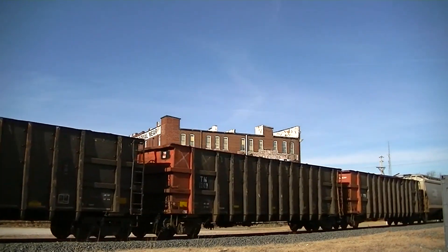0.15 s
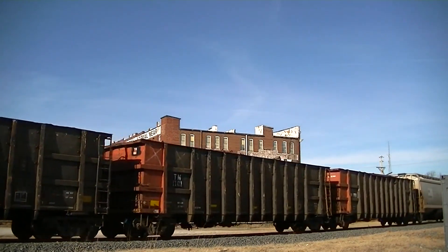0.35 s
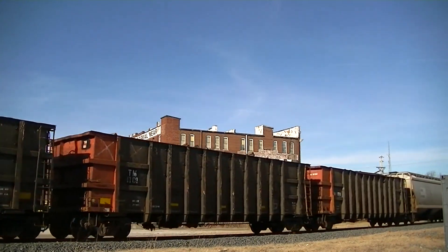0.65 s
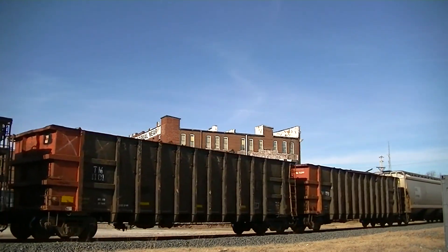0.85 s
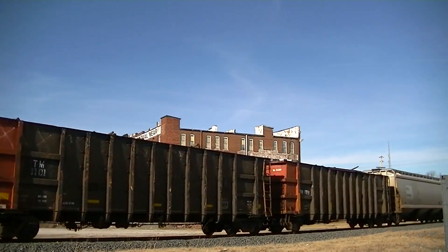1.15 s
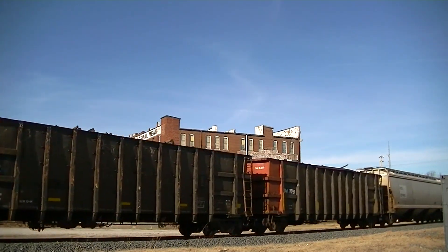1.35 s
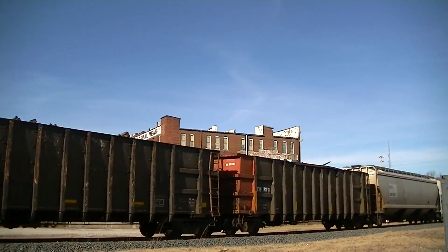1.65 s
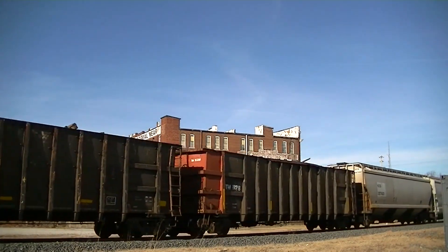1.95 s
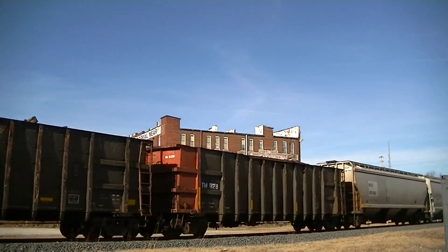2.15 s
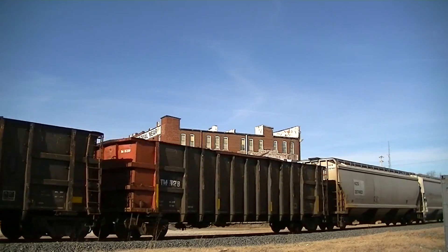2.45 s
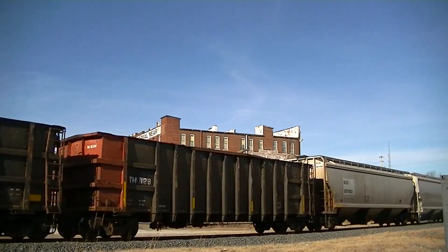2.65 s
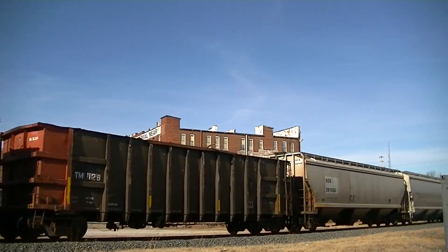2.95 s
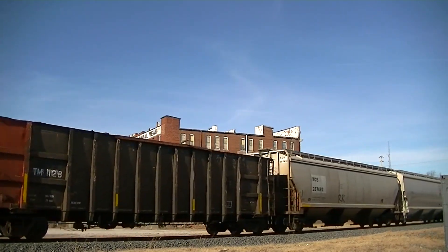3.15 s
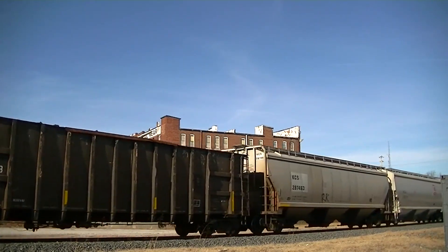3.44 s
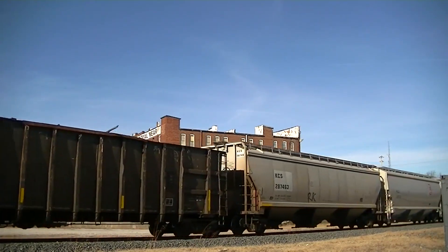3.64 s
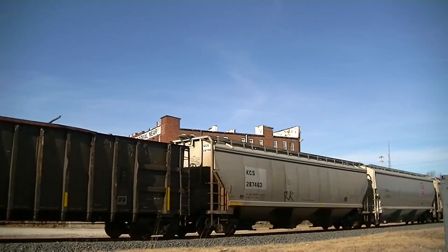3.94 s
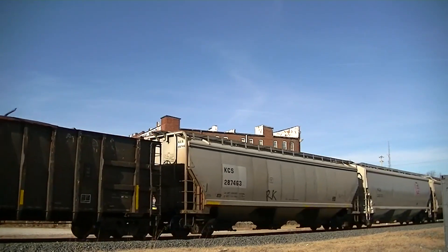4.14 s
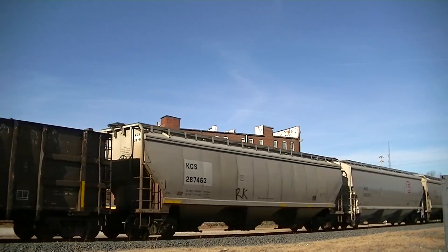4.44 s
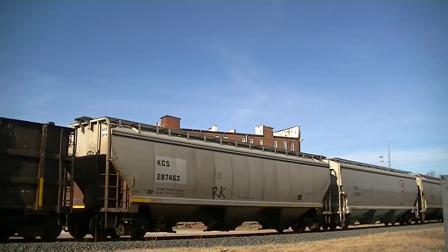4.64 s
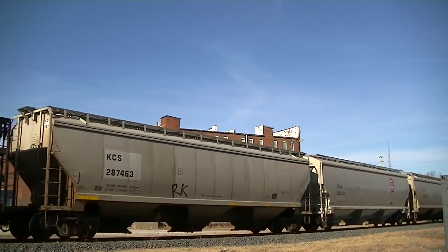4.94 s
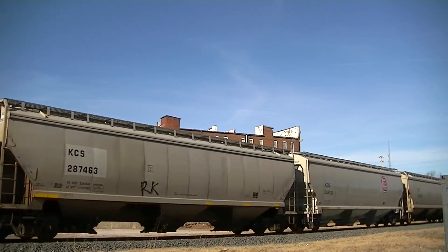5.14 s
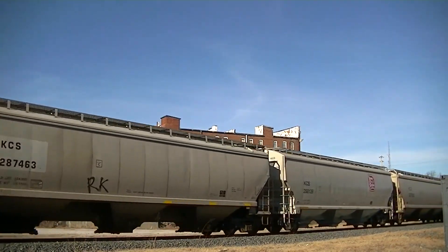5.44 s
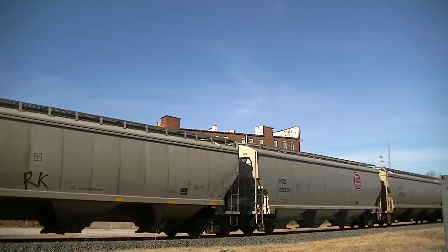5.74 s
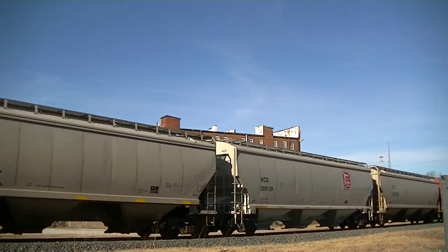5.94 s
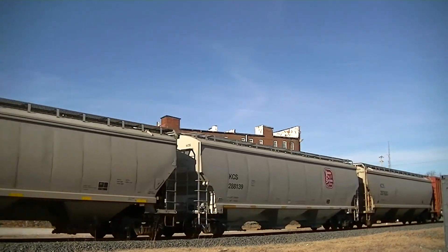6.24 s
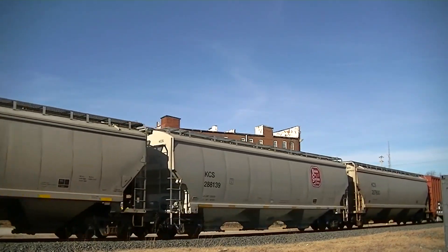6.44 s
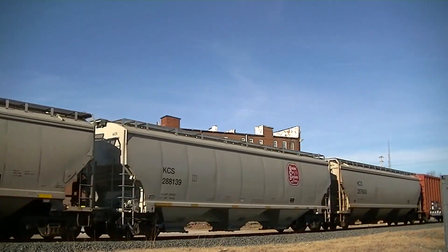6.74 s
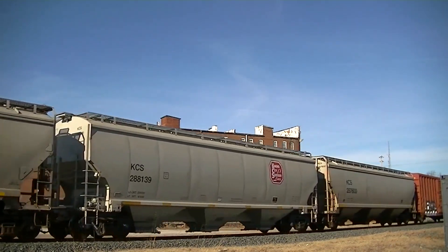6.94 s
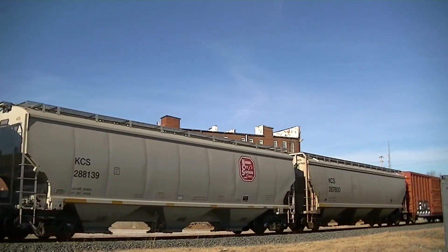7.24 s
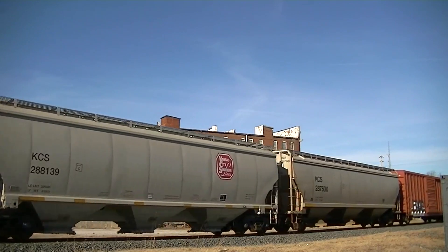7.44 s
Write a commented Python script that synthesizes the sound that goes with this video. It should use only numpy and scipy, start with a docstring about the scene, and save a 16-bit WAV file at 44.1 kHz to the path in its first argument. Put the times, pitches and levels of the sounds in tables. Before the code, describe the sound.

Close beside an outdoor track, freight wagons rumble and roar past while a distant chordal train horn is already blowing. As it fades, a long, piercing metallic wheel squeal takes over, thinning into high whistles. Then come rapid dull knocks and dry steel chirps, a second short squeal sinking in pitch, wind puffs on the microphone, and the far horn again.

```python
"""A far horn is already sounding up the line while a freight train rumbles and roars past close by.
Rolling, grinding flanges and wind are coloured noise; the horn is a chord of wavering partials.
Squeals are vibrating wheel modes: one long squeal that ends in thin whistles, then a short one after
a few knocks and chirps, which are brief dying noise bursts. The horn sounds again near the end."""
import sys
import numpy as np
from scipy import signal
from scipy.fft import rfft, irfft, next_fast_len
from scipy.io import wavfile
from scipy.ndimage import uniform_filter1d

SR = 44100
rng = np.random.default_rng(int(sys.argv[2]) if len(sys.argv) > 2 else 0)


def master(y):
    """Save y as 16-bit WAV."""
    cut = np.clip(np.atleast_2d(y).T, -1, 1)
    pcm = np.round(cut * 32767)  # scale
    wavfile.write(sys.argv[1], SR, pcm.astype(np.int16))


N = 334719
TIME = np.arange(N) / SR  # seconds

# Noise colour of the wagons, rail, flanges and wind: (frequency [Hz], relative density [dB per Hz])
RUMBLE_COLOUR = [(90, -52), (150, -18.5), (210, -10), (300, 1.5), (450, 3.5), (700, -1.5), (1100, -8.5),
                 (2500, -46)]
ROAR_COLOUR = [(150, -32.5), (400, -4.5), (700, -3.5), (1000, 2), (1250, -0.5), (1650, 3), (2150, 0.5),
               (2400, -4.5), (2750, -2), (3100, -6), (4200, -7), (5500, -15.5), (8000, -25.5),
               (15000, -54.5)]
HISS_COLOUR = [(300, -47), (900, -7), (1500, -2), (2000, 2), (3000, 1.5), (4500, 2.5), (6200, 0.5),
               (7500, -3.5), (9500, -7.5), (10300, -9.5), (12000, -16), (15500, -32)]
WIND_COLOUR = [(80, -40), (150, -17), (280, 2.5), (430, 3), (800, -5), (1600, -18), (5000, -49)]
# Stereo spread of the train noise, and of the wind at two separate ports: (frequency [Hz], side minus mid [dB])
TRAIN_SPREAD = [(300, -33), (900, -79), (2000, -19), (4000, -15.5), (8000, -65)]
WIND_SPREAD = [(100, 0), (5000, 0)]

# Rumble, sinking under the long squeal, and rail roar: (time [s], relative level [dB])
RUMBLE_LEVEL = [(0, -35.5), (.7, -39), (1.2, -36.5), (1.68, -33.5), (1.85, -43), (2.75, -46), (3.4, -45),
                (4.05, -50), (4.6, -53), (4.93, -48.5), (5.09, -36), (5.4, -40), (5.57, -36), (5.72, -44.5),
                (6.0, -38.5), (6.42, -44), (6.9, -38.5), (7.59, -38.5)]
ROAR_LEVEL = [(0, -32.5), (1.2, -33), (1.75, -33), (2.7, -41), (3.0, -38.5), (3.35, -44), (4.0, -45.5),
              (4.95, -45.5), (5.15, -38), (5.6, -32.5), (5.74, -44), (5.89, -37), (6.15, -41.5),
              (6.45, -49), (6.85, -40.5), (7.06, -37.5), (7.15, -40), (7.32, -36.5), (7.59, -36)]
# Jolts of the wagons over uneven rail: (time [s], relative peak level [dB])
JOLTS = [(1.27, -47), (2.97, -46), (3.38, -48), (3.57, -50.5), (5.87, -47), (6.28, -35), (6.52, -38),
         (6.73, -36), (7.07, -35)]
# Light scrapes of other flanges: (start [s], end [s], relative level [dB])
SCRAPES = [(0, 0.153, -59), (0.35, 0.618, -47), (1.503, 1.75, -50), (5.104, 5.56, -52.5),
           (5.735, 5.98, -56.5), (6.935, 7.06, -51.5), (7.236, 7.45, -50.5)]

# Modes of the long-squealing and short-squealing wheels: (frequency [Hz], width [Hz], relative level [dB])
LONG_WHEEL = [(1395, 25, -14), (1705, 110, -4), (2510, 60, -3.5), (3340, 90, -1.5), (3975, 70, -10),
              (4230, 110, -2), (4825, 90, -12), (5140, 100, -6), (5800, 150, -14), (6080, 60, -9),
              (6700, 100, -12.5), (7035, 90, -14), (7580, 70, -22), (8020, 70, -19), (8650, 110, -24),
              (9250, 160, -22), (10000, 230, -18), (10750, 160, -24)]
SHORT_WHEEL = [(1400, 50, -15), (1700, 190, -6.5), (2465, 90, -4), (3280, 90, -2), (4120, 120, -1.5),
               (5035, 80, -6), (5930, 100, -12), (6800, 200, -15), (8050, 110, -16), (8550, 120, -21),
               (9170, 80, -22), (9920, 60, -20), (10070, 70, -18), (10470, 50, -24), (10780, 70, -22)]
# Flange pressure on the long-squealing wheel: (time [s], level [dB])
LONG_PRESSURE = [(1.68, -44.5), (1.79, -30.5), (2.25, -29.5), (2.42, -31), (2.7, -30.5), (3.4, -33.5),
                 (3.85, -30), (4.55, -30), (4.95, -34.5), (5.08, -50), (5.4, -58)]
# Doppler shift as that wheel goes by: (time [s], pitch of the lower locked mode [Hz])
PASSING_PITCH = [(1.7, 3383), (2.2, 3377), (2.6, 3365), (3.0, 3353), (3.7, 3353), (4.3, 3338), (4.7, 3340),
                 (4.95, 3320), (5.1, 3260)]
# Flange pressure on the short-squealing wheel: (time [s], level [dB], Doppler shift [%])
SHORT_PRESSURE = [(6.06, -56, 1.38), (6.14, -31.5, 1.16), (6.28, -28.5, 0.67), (6.4, -29.5, 0.2),
                  (6.59, -31.5, -0.37), (6.65, -36.5, -0.67), (6.78, -42, -0.93), (6.9, -51, -1.9)]
# Hiss against ringing, harsher as the long-squealing wheel nears: (time [s], relative level [dB])
LONG_HARSHNESS = [(1.8, -7.5), (2.7, -8.5), (3.2, -4.5), (3.52, -3.5), (3.62, -1.5), (4.1, -4), (4.6, -5.5),
                  (4.95, -1)]
# The same for the short squeal, harshest at its first bite: (time [s], relative level [dB])
SHORT_HARSHNESS = [(6.08, 2.5), (6.15, -4), (6.28, -6.5), (6.38, -10.5), (6.6, -6), (6.8, -15.5)]
# A faint squeal from the same kind of wheel beforehand, one row: (start [s], end [s], level [dB])
FORE_SQUEAL = (.41, 0.59, -37.5)
# Spells when a main mode locks into self-sustained vibration: (start [s], end [s], level [dB])
LOWER_LOCKS = [(1.78, 1.95, -30.5), (1.96, 2.02, -26), (2.11, 2.2, -24), (2.24, 2.33, -27),
               (2.52, 2.84, -21), (2.88, 3.1, -23), (3.1, 3.56, -19), (3.63, 3.79, -22), (4.15, 4.39, -22),
               (4.52, 4.7, -21.5), (4.76, 4.93, -24), (5.0, 5.28, -37.5)]
UPPER_LOCKS = [(1.725, 1.83, -34), (1.84, 2.16, -25), (2.2, 3.36, -35), (3.84, 3.93, -31),
               (3.93, 4.16, -23.5), (4.2, 4.55, -30.5)]
# Single modes that swell and ring out: (start [s], end [s], frequency [Hz], level [dB], roughness [0-1])
WHISTLES = [(.404, .632, 5100, -39, .95), (.42, .65, 4190, -39.5, .95), (.4, .64, 3370, -42, 1),
            (1.76, 1.85, 1690, -28, .75), (1.78, 1.9, 2545, -32, .6), (2.08, 2.13, 2530, -30, .4),
            (2.23, 2.32, 5150, -29.5, .4), (2.48, 2.66, 5170, -36, .4), (2.603, 3.246, 1390, -40.5, .4),
            (2.92, 3.15, 1715, -34.5, .68), (2.92, 3.0, 6090, -36, .4), (3.0, 3.2, 8080, -43, .4),
            (3.3, 3.65, 3975, -38, .45), (3.66, 3.71, 6700, -35, .4), (3.84, 4.15, 1690, -31, .7),
            (3.86, 3.97, 6075, -31, .4), (3.9, 4.16, 7995, -38.5, .4), (3.9, 4.2, 8980, -46, .5),
            (4.04, 4.14, 7020, -36, .4), (4.2, 4.28, 5130, -31, .6), (4.24, 4.44, 6685, -33, .5),
            (4.3, 4.6, 3960, -35, .5), (4.4, 4.62, 7008, -33, .35), (4.44, 4.68, 6668, -33, .55),
            (4.45, 4.52, 1725, -28.5, .4), (4.45, 4.61, 5130, -29, .55), (4.66, 4.79, 2487, -27.5, .45),
            (4.7, 4.98, 5105, -34.5, .55), (4.76, 4.94, 6030, -37, .5), (4.77, 4.81, 6665, -34, .4),
            (4.8, 4.92, 4790, -36, .4), (4.82, 4.9, 9900, -41, .4), (4.85, 4.99, 2470, -35, .5),
            (4.88, 4.96, 6668, -31.5, .5), (5.393, 5.62, 1627, -44, .7), (6.08, 6.175, 2480, -28, .8),
            (6.12, 6.2, 1800, -33, .88), (6.2, 6.24, 4160, -31, .6), (6.255, 6.35, 3300, -28.5, .6),
            (6.28, 6.39, 5050, -35, .6), (6.29, 6.52, 4140, -27.5, .7), (6.46, 6.6, 2446, -37, .6),
            (6.45, 6.62, 5930, -37.5, .55), (6.535, 6.6, 4120, -27, .6), (6.545, 6.585, 5005, -32, .5)]
# Thin modes that sing on as the flange lets go: (frequency [Hz], level [dB])
THIN_MODES = [(4786, -38.5), (6685, -46), (6977, -49), (8177, -56), (8522, -48), (8880, -53), (9189, -48),
              (9860, -42.5), (10650, -43), (11540, -51.5)]
# Left-right place of the squeals: (time [s], left minus right [dB])
SQUEAL_PAN = [(0, 3), (1.7, -2), (2.3, -1.5), (3.2, -1), (4.2, -2.5), (5, 1), (6.2, 0.7), (7.59, 4)]

# Knocks of the running gear: (time [s], relative level [dB])
KNOCKS = [(5.617, -38), (5.700, -27.5), (5.752, -26), (5.819, -29), (5.868, -31), (5.909, -24),
          (5.955, -31), (5.994, -25), (6.031, -24.5), (6.066, -30), (6.102, -22.5), (6.731, -26)]
# Chirps of dry steel: (time [s], relative level [dB], frequency [Hz], width [Hz])
CHIRPS = [(5.742, -46, 8000, 600), (5.781, -40, 7340, 250), (5.790, -42, 8050, 250),
          (5.822, -45, 8250, 400), (5.876, -43, 7900, 500), (5.917, -38, 8100, 500),
          (5.926, -42, 7850, 250), (5.961, -47, 7900, 400), (6.031, -47, 7800, 2500),
          (6.068, -32, 6000, 3000), (6.097, -22.5, 6000, 3000), (6.272, -27, 6000, 2000)]

# Partials of the horn chord in each blast: (frequency [Hz], relative level [dB])
FIRST_CHORD = [(473, -42), (513, -42), (533, -43), (603, -38), (624, -39.5), (701, -36), (728, -37),
               (770, -36), (799, -40), (904, -35.5), (939, -31), (983, -36), (1029, -37), (1050, -38),
               (1066, -37), (1205, -43), (1250, -43), (1286, -39.5), (1401, -45), (1460, -44), (1541, -39),
               (1680, -43), (1798, -44), (1966, -43), (2053, -46)]
SECOND_CHORD = [(431, -46.5), (515, -45.5), (603, -35.5), (701, -46), (732, -36), (782, -43), (809, -46),
                (904, -42), (941, -36), (990, -42), (1046, -38), (1206, -44), (1410, -45), (1540, -41),
                (1798, -43)]
# Strength of each blast, added to its partials: (time [s], relative level [dB])
FIRST_BLAST = [(0, 3), (.17, -1.5), (.3, 1.5), (.55, -1.5), (.7, 2), (.8, -0.5), (.95, 3), (1.2, 2),
               (1.4, -1), (1.6, -4.5), (1.9, -20), (2.25, -38), (2.4, -42)]
SECOND_BLAST = [(6.75, -26), (6.98, -3.5), (7.15, -3.5), (7.35, 1.5), (7.59, -1)]
# The note of the first blast that lingers, one row: (start [s], end [s], frequency [Hz], level [dB])
LAST_NOTE = (1.55, 2.3, 730, -40)
# Gusts of wind on the microphone: (start [s], end [s], relative level [dB])
GUSTS = [(2.263, 2.484, -43.5), (2.545, 2.87, -53), (3.33, 3.45, -61), (5.58, 5.784, -40.5),
         (5.855, 6.053, -39), (6.117, 6.527, -43.5), (6.614, 6.897, -46.5), (7.035, 7.253, -42)]

JOLT_S = 0.038
HISS_UNDER_ROAR_DB = -31  # every rolling wheel rubs a little
SCRAPE_RISE_S, SCRAPE_T60_S = 0.063, 0.57
LOCK_RISE_S, LOCK_T60_S = 0.029, 0.6
UPPER_HZ, UPPER_WIDTH_HZ, UPPER_ROUGH = 4238, 65, 0.55
WHISTLE_RISE_SHARE, WHISTLE_T60_S = 0.35, 0.42  # the rise is a share of the time from start to end
THIN_START_S, THIN_END_S, THIN_RISE_S, THIN_T60_S = 4.74, 5.21, 0.24, 0.8
HORN_WIDTH_HZ, HORN_ROUGH, HORN_ECHO_S = 8, 0.72, 0.13
GUST_RISE_S, GUST_T60_S = 0.043, 0.35
EDDY_DEPTH = 0.4
RIPPLE_STEP_HZ = 22
LOW_CUT_HZ, EDGE_HZ = 70, 15700


def amp(db):
    """Decibels to gain."""
    return 10 ** (np.asarray(db) / 20)


def evened(x):
    """Scales to rms 1."""
    return x / np.sqrt(np.mean(abs(x) ** 2) + 1e-20)


def curve(rows, column=1):
    """One column of a table, drawn as a line through every sample."""
    rows = np.array(rows)
    return np.interp(TIME, rows[:, 0], rows[:, column])


def level(rows, column=1):
    """A dB column as a gain that falls 300 dB per second outside its span."""
    outside = np.maximum(np.maximum(rows[0][0] - TIME, TIME - rows[-1][0]), 0)
    return amp(curve(rows, column) - 300 * outside)


def read(points, hz):
    """A spectrum table at any frequency."""
    table_hz, db = np.transpose(points)
    return np.interp(np.log(hz + 1), np.log(table_hz), db)


def during(start, end):
    """The samples between two times."""
    return slice(max(round(start * SR), 0), round(end * SR))


def laid(sound, span):
    """Sets a short sound at its time in the scene."""
    out = np.zeros(N)
    out[span] = sound
    return out


def held(start, end, rise_s, t60):
    """An envelope that swells, holds until its end and rings out."""
    span = during(start, end + t60)
    t = TIME[span]
    swell = np.sin(np.pi / 2 * np.clip((t - start) / rise_s, 0, 1)) ** 2
    ring_out = amp(-60 * np.maximum(t - end, 0) / t60)
    return laid(swell * ring_out, span)


def placed(x, pan_db):
    """Sets a sound between left and right; positive dB leans left."""
    return x * np.array([amp(pan_db / 2), amp(-pan_db / 2)]).reshape(2, -1)


def flutter(width_hz, span=slice(None)):
    """Complex random envelope of a resonance of this width, with steep far skirts."""
    count = 4096
    offset = np.fft.fftfreq(count, TIME[-1] / count) / (width_hz / 2)  # in half-widths
    a, b = rng.standard_normal((2, count))
    line = (a + 1j * b) / (1 + 1j * offset) / (1 + 1j * offset / 4)
    envelope = evened(np.fft.ifft(line))
    return np.interp(TIME[span], np.linspace(0, TIME[-1], count), envelope)


def mode(hz, width_hz, rough=1, span=slice(None)):
    """A vibrating mode: a steady part plus a part shaken by random slips."""
    rough = np.clip(rough, 0, 1)
    swing = np.sqrt(1 - rough ** 2) + rough * flutter(width_hz, span)
    turns = np.cumsum(hz * np.ones(len(swing))) / SR + rng.random()
    phase = np.float32(2 * np.pi * (turns - np.floor(turns)))
    return np.sqrt(2) * (swing.real * np.cos(phase) - swing.imag * np.sin(phase))


def noise(colour, spread, patchy_db, flicker_db, ripple_db):
    """Coloured stereo noise: drifting patches, shared flicker, fixed ripple of countless weak resonances."""
    frames, bins = N // 256 + 5, 513
    a, b, c, d, patches = rng.standard_normal((5, frames, bins))
    patches = uniform_filter1d(patches, size=5, axis=0)
    patches = evened(uniform_filter1d(patches, size=12, axis=1))
    flicker = evened(uniform_filter1d(rng.standard_normal(frames), size=4))
    flicker = flicker.clip(-2, 2)[:, None]
    grid = np.array([a + 1j * b, c + 1j * d]) * amp(patchy_db * patches + flicker_db * flicker)
    white = signal.istft(grid.swapaxes(1, 2), nperseg=1024, noverlap=768)[1]

    size = next_fast_len(white.shape[1])
    f = np.fft.rfftfreq(size, 1 / SR)
    peaks_hz = np.arange(0, SR / 2, RIPPLE_STEP_HZ)
    peaks = np.minimum(rng.exponential(1, len(peaks_hz)), 4)
    ripple = np.interp(f, peaks_hz, peaks)
    tint = amp(read(colour, f) + ripple_db * ripple)
    width = [np.ones(len(f)), amp(read(spread, f))]
    mid, side = irfft(rfft(white, size) * tint * width, size)[:, :N]
    return evened(np.array([mid + side, mid - side]))


def burst(s, hz, width_hz, t60):
    """A short band of noise that starts almost at once and dies away."""
    size = 8192
    t, f = np.arange(size) / SR, np.fft.rfftfreq(size, 1 / SR)
    band = 1 / (1 + ((f - hz) / width_hz) ** 2 / 2) ** 2
    ring = evened(irfft(rfft(rng.standard_normal(size)) * band))
    hit = ring * amp(-60 * t / t60) * (1 - np.exp(-t / 0.00078))
    hit = signal.sosfilt(signal.butter(4, 230, "high", fs=SR, output="sos"), hit)
    return np.concatenate([np.zeros(round(s * SR)), hit, np.zeros(N)])[:N]


def rolling():
    """Rough treads shake the wagons (rumble) and the rail (roar); uneven spots jolt the wagons."""
    jolts = sum(amp(db) * np.exp(-((TIME - s) / JOLT_S) ** 2) for s, db in JOLTS)
    shaking = np.hypot(level(RUMBLE_LEVEL), jolts) * amp(1.0)
    rumble = shaking * noise(RUMBLE_COLOUR, TRAIN_SPREAD, patchy_db=0.8, flicker_db=1.1, ripple_db=0.6)
    roar = level(ROAR_LEVEL) * amp(6.0)
    roar = roar * noise(ROAR_COLOUR, TRAIN_SPREAD, patchy_db=1.5, flicker_db=0.88, ripple_db=1.3)
    return placed(rumble + roar, 0.45)


def wheel(modes, doppler, span):
    """Slips shake all modes of a wheel."""
    ringing = sum(amp(db) * mode(hz * doppler[span], width, span=span) for hz, width, db in modes)
    return laid(ringing, span)


def locked(locks):
    """Strength of a mode that snaps into self-sustained vibration and slips out again."""
    spells = [amp(db) * held(start, end, LOCK_RISE_S, LOCK_T60_S) for start, end, db in locks]
    return np.max(spells, axis=0)


def long_squeal():
    """Slips shake all modes of the wheel; two of them lock now and then into a piercing tone."""
    pitch_hz = curve(PASSING_PITCH)
    doppler = pitch_hz / np.median(np.array(PASSING_PITCH)[:, 1])
    start, end, db = FORE_SQUEAL
    pressure = level(LONG_PRESSURE) + amp(db) * held(start, end, SCRAPE_RISE_S, SCRAPE_T60_S)
    span = during(start, LONG_PRESSURE[-1][0] + 0.1)
    shaken = pressure * wheel(LONG_WHEEL, doppler, span)

    lock = locked(LOWER_LOCKS)
    # the stronger the lock, the purer the tone
    rough = np.interp(20 * np.log10(lock + 1e-9), [-27, -20], [0.8, 0.27])
    lower = lock * mode(pitch_hz, width_hz=120, rough=rough)
    # the upper tone glides about half as far in proportion
    upper = mode(UPPER_HZ * np.sqrt(doppler), UPPER_WIDTH_HZ, UPPER_ROUGH)
    return shaken + lower + locked(UPPER_LOCKS) * upper


def short_squeal():
    """A second wheel bites briefly, sinking in pitch as it passes."""
    doppler = 1 + curve(SHORT_PRESSURE, 2) / 100
    span = during(SHORT_PRESSURE[0][0] - 0.1, SHORT_PRESSURE[-1][0] + 0.1)
    return level(SHORT_PRESSURE) * wheel(SHORT_WHEEL, doppler, span)


def whistles():
    """Each whistling mode builds up, holds and rings out; the rougher it is, the wider its line."""
    out = np.zeros(N)
    for start, end, hz, db, rough in WHISTLES:
        span = during(start, end + WHISTLE_T60_S)
        swell = held(start, end, WHISTLE_RISE_SHARE * (end - start), WHISTLE_T60_S)[span]
        out[span] += amp(db) * swell * mode(hz, width_hz=10 + 75 * abs(rough), rough=rough, span=span)
    return out


def thin_whistles():
    """As the pressure eases, the wheel's high modes swell together and ring out."""
    span = during(THIN_START_S, THIN_END_S + THIN_T60_S)
    ring = sum(amp(db) * mode(hz, width_hz=49, rough=0.4, span=span) for hz, db in THIN_MODES)
    return held(THIN_START_S, THIN_END_S, THIN_RISE_S, THIN_T60_S) * laid(ring, span)


def grinding():
    """Flanges scrape the rail head in an uneven hiss that rings in the steel and grows with pressure."""
    rubs = [level(ROAR_LEVEL) * amp(HISS_UNDER_ROAR_DB)]
    rubs += [level(LONG_PRESSURE) * amp(curve(LONG_HARSHNESS))]
    rubs += [level(SHORT_PRESSURE) * amp(curve(SHORT_HARSHNESS))]
    rubs += [amp(db) * held(start, end, SCRAPE_RISE_S, SCRAPE_T60_S) for start, end, db in SCRAPES]
    strength = np.linalg.norm(rubs, axis=0) * amp(8.0)
    return strength * noise(HISS_COLOUR, TRAIN_SPREAD, patchy_db=1.1, flicker_db=1.0, ripple_db=2.1)


def clatter():
    """Dull knocks with a short steel clack on top, and dry chirps, all dying bands of noise."""
    out = np.zeros(N)
    for s, db in KNOCKS:
        thud = burst(s, hz=393, width_hz=110, t60=0.037)
        clack = amp(-1.0) * burst(s, hz=1100, width_hz=2500, t60=0.048)
        out += amp(db) * (thud + clack)
    for s, db, hz, width in CHIRPS:
        out += amp(db) * burst(s, hz, width, t60=0.096)
    return out


def horn(chord, blast):
    """Far horn: echoes from the moving wagons make each partial waver, and one arrives late from the side."""
    span = during(blast[0][0] - 0.1, blast[-1][0] + 0.1)
    partials = sum(amp(db) * mode(hz, HORN_WIDTH_HZ, HORN_ROUGH, span) for hz, db in chord)
    ahead = level(blast) * laid(partials, span)
    aside = np.interp(TIME - HORN_ECHO_S, TIME, ahead, left=0)
    return ahead + amp(-24.5) * np.array([aside, -aside])


def last_note():
    """One chime of the horn, a single wavering mode, holds on after the chord has faded."""
    start, end, hz, db = LAST_NOTE
    return amp(db) * held(start, end, rise_s=0.071, t60=0.2) * mode(hz, width_hz=7.8, rough=0.4)


def wind():
    """Small eddies buffet each microphone port separately, the left one harder."""
    gusts = [amp(db) * held(start, end, GUST_RISE_S, GUST_T60_S) for start, end, db in GUSTS]
    strength = np.linalg.norm(gusts, axis=0)
    buffets = abs(np.array([flutter(width_hz=54) for _ in range(2)]))
    eddies = 1 - EDDY_DEPTH + EDDY_DEPTH * buffets
    air = noise(WIND_COLOUR, WIND_SPREAD, patchy_db=1.5, flicker_db=0.8, ripple_db=2)
    return placed(strength * evened(eddies * air), 5.9)


def scene():
    """All sources, the squeals drifting slightly between the ears."""
    squeals = long_squeal() + short_squeal() + whistles() + thin_whistles()
    pan_db = curve(SQUEAL_PAN)
    # many wheels hiss, so the hiss stays nearer the middle
    flanges = placed(squeals, pan_db) + placed(grinding(), 0.062 * pan_db)
    horns = horn(FIRST_CHORD, FIRST_BLAST) + last_note() + horn(SECOND_CHORD, SECOND_BLAST)
    return rolling() + flanges + placed(clatter(), 1.0) + placed(horns, 0.77) + wind()


def record(dry):
    """The recorder's low cut and upper band limit."""
    thinned = signal.sosfilt(signal.butter(2, LOW_CUT_HZ, "high", fs=SR, output="sos"), dry)
    band_limit = signal.firwin(511, EDGE_HZ, window=("kaiser", 9), fs=SR)
    return signal.oaconvolve(thinned, band_limit[None], "same")


dry = scene()
out = record(dry)
master(out)
```